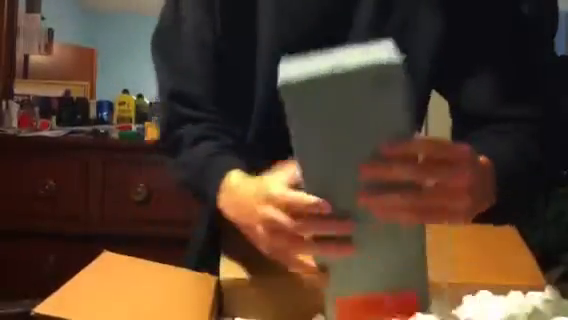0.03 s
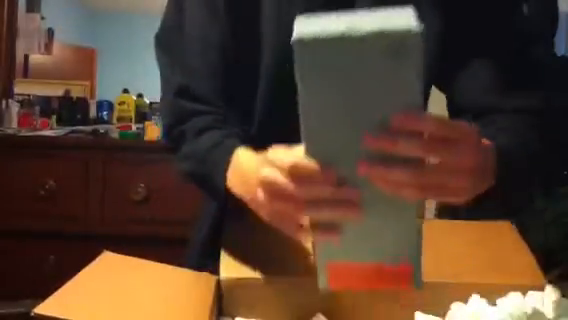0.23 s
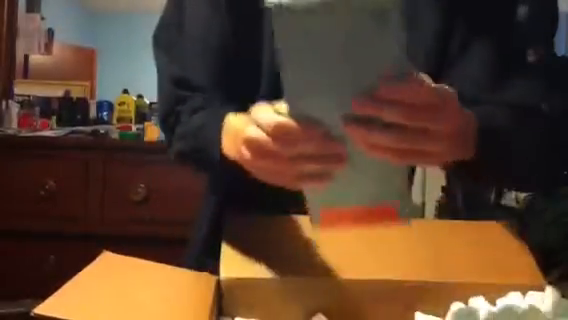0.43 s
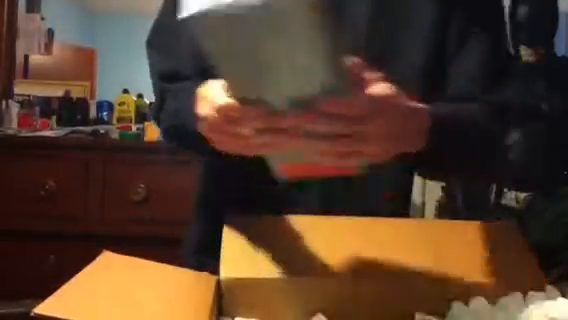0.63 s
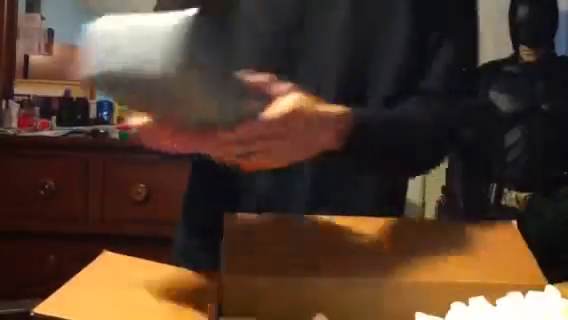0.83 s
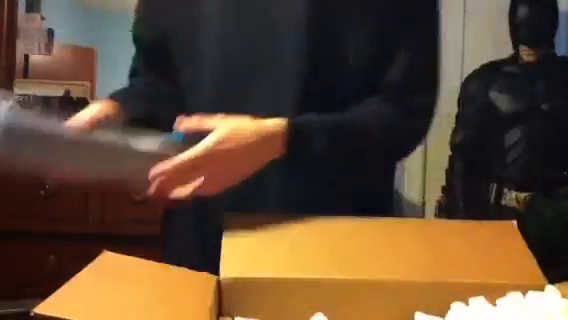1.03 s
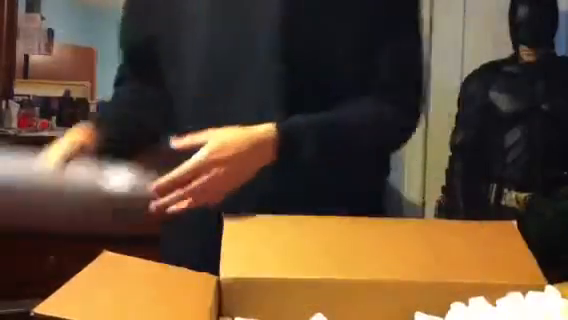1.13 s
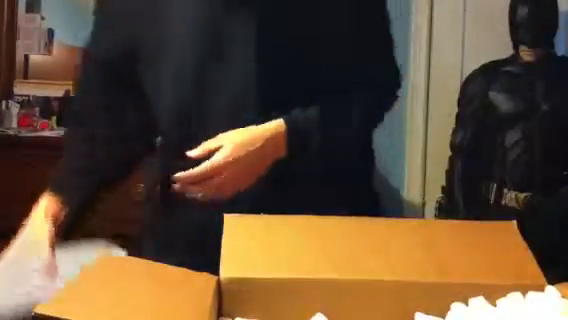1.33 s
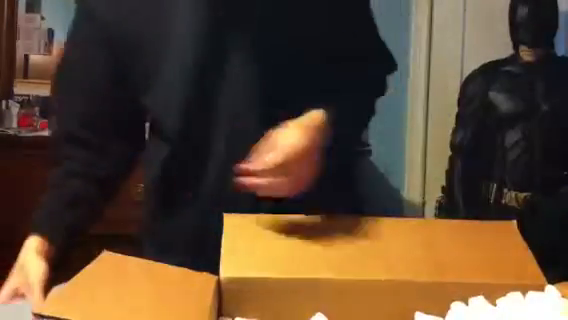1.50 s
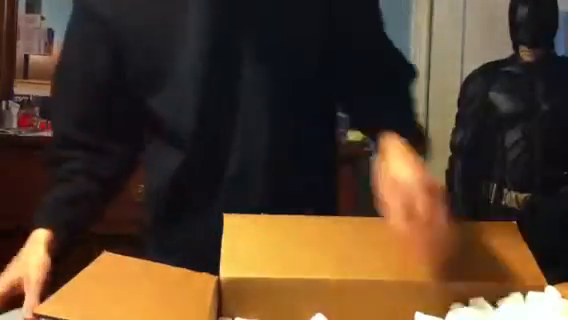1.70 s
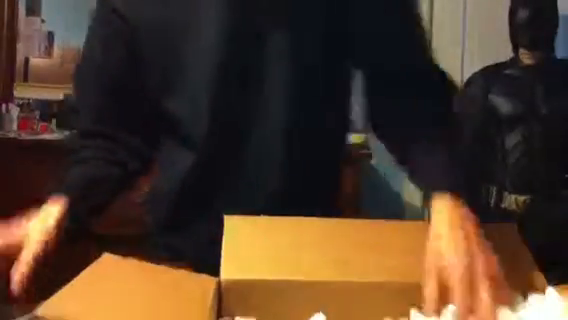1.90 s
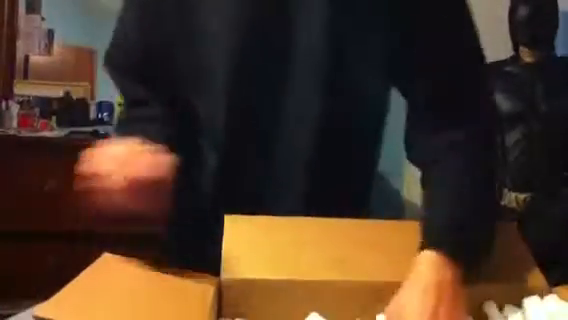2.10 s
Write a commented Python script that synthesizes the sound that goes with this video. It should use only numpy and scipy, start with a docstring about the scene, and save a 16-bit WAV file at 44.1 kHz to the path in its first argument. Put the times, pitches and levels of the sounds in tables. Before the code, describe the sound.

A handled box knocks as its contents shift, is set down, then packing foam rustles.

```python
"""Unpacking a box from packing peanuts

One microphone in a small furnished room. A slim box is lifted out of a carton of packing peanuts:
foam hisses along it, and the contents knock inside it. Fingers pat the box and sleeves rub while it
is turned; it is set down with a lighter knock. A hand bumps the carton and digs into the foam again."""
import sys
import numpy as np
from scipy import signal
from scipy.fft import rfft, irfft, next_fast_len
from scipy.io import wavfile
from scipy.ndimage import map_coordinates

SR = 44100
rng = np.random.default_rng(int(sys.argv[2]) if len(sys.argv) > 2 else 0)


def generate_wav(signal):
    """Clip the signal to [-1, 1] and save it as 16-bit WAV at the path in sys.argv[1]."""
    frames = np.transpose(np.atleast_2d(signal))
    scaled = np.clip(frames, -1, 1) * 32767
    pcm = np.round(scaled).astype(np.int16)
    wavfile.write(sys.argv[1], SR, pcm)


N = 94815


def amp(db):
    """Decibels to gain."""
    return 10 ** (np.asarray(db) / 20)


def unit(x):
    """Scale to rms 1."""
    return x / np.sqrt(np.mean(x ** 2) + 1e-20)


def along(points, hz):
    """Interpolate rows of frequency_hz, value on a log frequency axis."""
    frequencies, values = np.transpose(points)
    return np.interp(np.log(hz + 1), np.log(frequencies + 1), values)


def level(rows):
    """Gain per sample from rows of time_s, level_db."""
    return amp(np.interp(np.arange(N) / SR, *np.transpose(rows)))


def wobble(rate_hz):
    """A smooth random curve with rate_hz knots a second."""
    knots = rng.standard_normal(int(N * rate_hz / SR) + 4)
    return map_coordinates(knots, [np.arange(N) * rate_hz / SR])


def colour(x, spectrum):
    """Causal filter from rows of frequency_hz, gain_db, scaled to keep the power of white noise."""
    size = 2 * next_fast_len(N)
    gain = unit(amp(along(spectrum, np.fft.rfftfreq(size, 1 / SR))))
    cepstrum = irfft(np.log(gain), size)
    cepstrum[1:size // 2] *= 2  # fold to minimum phase
    cepstrum[size // 2 + 1:] = 0
    return irfft(rfft(x, size) * np.exp(rfft(cepstrum)), size)[:N]


def add(track, start_s, sound):
    """Mix a sound into the track at start_s."""
    i = max(0, round(start_s * SR))
    track[i:i + len(sound)] += sound[:max(0, N - i)]


def blows(rows, spectrum, t60_s, room_db, push_db):
    """Each contact gives one push, shakes damped cardboard panels, and the room answers."""
    out, t = np.zeros(N), np.arange(SR // 2) / SR
    for start_s, db, *_ in rows:
        shake = rng.standard_normal(len(t)) * amp(-60 * t / t60_s)
        shake[0] += amp(push_db)
        add(out, start_s, amp(db) * (shake + amp(room_db) * room_tail()))
    return colour(out, spectrum)


def ring(start_s, modes, attack_s):
    """A contact sets the modes ringing as decaying sines."""
    out, t = np.zeros(N), np.arange(SR // 2) / SR
    attack = 1 - np.exp(-t / attack_s)
    for hz, db, t60_s in modes:
        phase = 2 * np.pi * (hz * t + rng.random())
        add(out, start_s, amp(db - 60 * t / t60_s) * np.sin(phase) * attack)
    return out


def cracks(rows, spectrum, t60_s, room_db):
    """The brief snap of hard edges meeting, and its reverberation."""
    out, t = np.zeros(N), np.arange(SR // 2) / SR
    for start_s, _, db in rows:
        snap = amp(-60 * t / t60_s) * rng.standard_normal(len(t))
        add(out, start_s, amp(db) * (snap + amp(room_db) * room_tail()))
    return colour(out, spectrum)


def contents_knock():
    """The contents shift and strike the inside of the held box; the second contact rings its modes."""
    # contents against the box: start_s, level_db, crack_db
    contacts = [(.2283, -35, -25), (.2299, -23, -31), (.2333, -24, -31), (.2395, -37.5, -37),
                (.2485, -37.5, -32)]
    # modes of the held box: pitch_hz, level_db, t60_s
    box_modes = [(345, -37, .13), (388, -36, .17), (474, -28, .18), (540, -26.5, .17), (638, -28.5, .18),
                 (765, -31, .15), (818, -32, .13), (897, -29.5, .18), (976, -32, .18), (1083, -31.5, .19),
                 (1386, -33, .14), (1528, -30.5, .18), (1576, -29, .19), (1661, -28, .215),
                 (1770, -31, .18), (1927, -35.5, .19), (2122, -34, .18), (2532, -37.5, .15),
                 (2946, -43, .17)]
    # dense ringing of its panels, and the snap of its edges: frequency_hz, gain_db
    panel_spectrum = [(30, -52), (90, -39), (180, -28), (270, -17.5), (350, -9.5), (530, 0), (800, -5.5),
                      (1080, -6), (1330, -9.5), (1680, -1.5), (2200, -6), (2650, -21), (3000, -15),
                      (4000, -31), (6000, -31.5), (10000, -36), (16000, -35.5)]
    snap_spectrum = [(100, -23), (600, 8), (3000, -6), (4000, -12.5), (8000, -14.5), (16000, -23)]
    snap = cracks(contacts, snap_spectrum, t60_s=0.0067, room_db=-8)
    panels = blows(contacts, panel_spectrum, t60_s=0.09, room_db=-11.5, push_db=25)
    return panels + ring(contacts[1][0], box_modes, attack_s=0.00053) + snap


def box_set_down():
    """One edge lands with a sharp tick, then the rest of the box, which rattles briefly."""
    # box meeting its support: start_s, level_db, crack_db
    contacts = [(1.5731, -39.5, -28), (1.5785, -37.5, -35), (1.5828, -42.5, -37), (1.6207, -78, -37)]
    # a thin bright edge rattling as it settles: start_s, level_db
    rattles = [(1.584, -51.5), (1.599, -59.5)]
    # modes of the box on its support: pitch_hz, level_db, t60_s
    resting_modes = [(224.3, -41, 0.13), (370, -27, 0.11), (526.6, -32.5, 0.12), (708, -48, .18),
                     (832, -42, .16), (934, -31.5, 0.041), (1161, -43, .13), (1385, -47, 0.17),
                     (1980, -53, .12), (6030, -65, .3)]
    # supported panels, rattling edge and landing snap: frequency_hz, gain_db
    panel_spectrum = [(30, -56), (100, -29.5), (220, -4.5), (450, -4), (950, -1), (1500, -7), (2200, -14.5),
                      (3200, -36), (4900, -41), (7000, -36), (9500, -20), (16000, -28.5)]
    edge_spectrum = [(100, -50), (3500, -24), (5000, -20), (5400, -3.5), (5850, -2), (6500, -19),
                     (8000, -16), (16000, -37)]
    snap_spectrum = [(100, 0), (900, 6.5), (3500, -4), (6000, -6.5), (10000, 2.5), (16000, -7)]
    snap = cracks(contacts, snap_spectrum, t60_s=0.005, room_db=-19)
    panels = blows(contacts, panel_spectrum, t60_s=0.095, room_db=-5.5, push_db=20)
    rattle = blows(rattles, edge_spectrum, t60_s=0.14, room_db=-2.5, push_db=8)
    return panels + ring(contacts[0][0], resting_modes, attack_s=0.0048) + snap + rattle


def packing_peanuts(slips_per_s=3200, spread_db=1.5, hiss_db=6, walls_db=-3.5):
    """Countless tiny slips of foam merge into a hiss; the carton's walls pick them up."""
    # foam rubbed by the box, then by the hand: time_s, level_db
    stirring = [(0, -60), (.05, -56.5), (.11, -57), (.2, -61.5), (.35, -68), (.65, -68), (.8, -75),
                (1.4, -75.5), (1.65, -72), (1.87, -67.5), (1.943, -64), (1.96, -51.5), (1.99, -48),
                (2.07, -48.5), (2.15, -50.5)]
    # rubbed foam and carton walls: frequency_hz, gain_db
    foam_spectrum = [(40, -36), (200, -4), (600, -8), (1200, -5.5), (2500, 0), (4000, -1), (7000, -3),
                     (10000, -1), (13000, -4), (16000, -8.5)]
    wall_spectrum = [(40, -32), (90, -17), (160, 4), (360, 0), (460, -3), (600, 2.5), (1000, -7.5),
                     (1800, -9), (5000, -37.5)]
    slipping = rng.random(N) < slips_per_s / SR
    slips = slipping * rng.standard_normal(N) * amp(spread_db * rng.standard_normal(N))
    grains = unit(unit(slips) + amp(hiss_db) * rng.standard_normal(N))
    walls = amp(walls_db + 1.9 * wobble(50)) * colour(rng.standard_normal(N), wall_spectrum)
    foam = amp(0.72 * wobble(60)) * colour(grains, foam_spectrum)
    return level(stirring) * (foam + walls)


def sleeves():
    """Cloth rubs unevenly as the hands move."""
    # strength of the rubbing: time_s, level_db
    rubbing = [(0, -64), (.06, -61), (.13, -66), (.36, -65), (.55, -64), (.6, -69), (.75, -72), (.86, -67),
               (1.02, -76), (1.12, -73), (1.33, -73), (1.488, -69), (1.505, -60), (1.56, -62), (1.69, -64),
               (1.8, -71), (2.15, -66)]
    # cloth friction: frequency_hz, gain_db
    cloth_spectrum = [(40, -32), (90, -29), (160, -2.5), (230, -2.5), (470, -1), (610, 2), (1000, -5.5),
                      (1800, -11), (3000, -28), (8000, -33), (16000, -38)]
    return level(rubbing) * amp(2.4 * wobble(44.96)) * colour(rng.standard_normal(N), cloth_spectrum)


def palms():
    """A palm slides on the box in short swells of friction noise."""
    # palm strokes: centre_s, half_length_s, level_db, peak_hz
    slides = [(0.178, .025, -58.5, 2150), (0.216, 0.021, -50, 1120), (0.667, 0.032, -69.5, 1290),
              (0.853, 0.051, -66, 402), (1.111, 0.067, -62.5, 1407), (1.126, 0.026, -67.5, 3800),
              (1.693, .06, -64, 1630), (2.132, 0.025, -47.5, 790)]
    # skin on cardboard: multiple_of_peak, gain_db
    palm_spectrum = [(.1, -39), (.25, -18), (.5, 3), (1, 8), (1.6, -1.5), (2.3, -12), (4.5, -10.5),
                     (12, -26)]
    out, t = np.zeros(N), np.arange(N) / SR
    for centre_s, half_length_s, db, peak_hz in slides:
        spectrum = [(peak_hz * ratio, gain_db) for ratio, gain_db in palm_spectrum]
        friction = colour(rng.standard_normal(N), spectrum)
        swell = np.exp(-2 * ((t - centre_s) / half_length_s) ** 2)
        out += amp(db + 0.59 * wobble(81)) * swell * friction
    return out


def fingers():
    """Fingers pat the box and shake its panels softly."""
    # fingers landing: start_s, level_db
    pats = [(.016, -54), (.157, -62), (.404, -58.5), (.479, -60.5), (.511, -70), (.659, -64), (.767, -65),
            (.806, -60), (.942, -64.5), (1.081, -72.5), (1.206, -66.5), (1.265, -59), (1.365, -67.5),
            (1.499, -58.5), (1.718, -55), (1.85, -61)]
    # patted cardboard: frequency_hz, gain_db
    pat_spectrum = [(40, -20), (100, -9), (190, 0.5), (450, -1), (620, 6.5), (1050, 4), (1500, -9.5),
                    (2200, -7), (3500, -34.5), (16000, -34)]
    return blows(pats, pat_spectrum, t60_s=0.17, room_db=-9, push_db=10.5)


def carton_bumps():
    """A hand bumps the carton: the walls thud and the flap rings."""
    # hand against the carton: start_s, level_db
    bumps = [(1.886, -57), (1.906, -48), (1.913, -49.5), (2.065, -52), (2.104, -46), (2.134, -43)]
    # modes of the flap: pitch_hz, relative_db, t60_s
    flap_modes = [(268, 3, .09), (960, 0, .08)]
    # struck carton walls: frequency_hz, gain_db
    thud_spectrum = [(40, -40), (100, -34), (170, 1.5), (260, 3.5), (360, 6), (480, -6.5), (1000, -3.5),
                     (1500, -13), (3000, -33.5), (16000, -31)]
    flap = sum(amp(db) * ring(start_s, flap_modes, attack_s=0.0022) for start_s, db in bumps)
    return flap + blows(bumps, thud_spectrum, t60_s=0.07, room_db=-4, push_db=14)


def carton_hollow(pitch_hz=364, t60_s=0.24, attack_s=0.012, waver_rad=0.55):
    """The jostled carton sounds one hollow note that swells quickly and dies, wavering."""
    # jolts to the carton: start_s, level_db
    jolts = [(.03, -47.5), (.06, -55), (.15, -59), (1.497, -50), (1.672, -53), (1.722, -56), (1.885, -48),
             (1.925, -50)]
    out, t = np.zeros(N), np.arange(SR) / SR
    attack = 1 - np.exp(-t / attack_s)
    for start_s, db in jolts:
        phase = 2 * np.pi * pitch_hz * (t + start_s) + waver_rad * wobble(63)[:SR]
        add(out, start_s, amp(db - 60 * t / t60_s) * attack * np.sin(phase))
    return out * amp(2 * wobble(70))


def cardboard_drags(width_hz=65, fade_s=0.021):
    """Friction stirs a narrow cardboard resonance, whose pitch shifts as the contact travels."""
    # cardboard dragged along: start_s, end_s, level_db, start_hz, end_hz
    drags = [(0.038, .2, -62.5, 352, 393), (1.497, 1.52, -63, 1040, 910), (1.98, 2.17, -57, 490, 653),
             (.81, 0.92, -65, 385, 350)]
    out, t = np.zeros(N), np.arange(N) / SR
    for start_s, end_s, db, start_hz, end_hz in drags:
        pitch_hz = np.interp(t, [start_s, end_s], [start_hz, end_hz])
        phase = 2 * np.pi * np.cumsum(pitch_hz) / SR
        band = wobble(width_hz) * np.cos(phase) + wobble(width_hz) * np.sin(phase)
        fade = np.clip(np.minimum(t - start_s, end_s - t) / fade_s, 0, 1)
        out += amp(db) * fade * unit(band)
    return out


def room_tail():
    """Half a second of the small room's reverberation, each band dying at its own speed."""
    # decay of the furnished room: frequency_hz, t60_s
    decay_times = [(100, 0.089), (400, 0.25), (1600, 0.27), (4000, 0.26), (14000, .2)]
    hz, t, bands = signal.stft(rng.standard_normal(SR // 2), SR, nperseg=256)
    decay = amp(-60 * t / along(decay_times, hz)[:, None])
    _, tail = signal.istft(bands * decay, SR, nperseg=256)
    return tail[:SR // 2]


def room_tone(air_db=-67.5, whine_hz=15000, whine_db=-82.5):
    """Steady room tone, hiss and a faint electrical whine."""
    # noise floor at the microphone: frequency_hz, gain_db
    air_spectrum = [(25, -1), (55, -41), (90, -13), (150, 4.5), (228, 6), (450, -9.5), (600, -28),
                    (1150, -7.5), (4000, -13), (10500, -14.5), (14600, -12), (15800, -12)]
    whine = amp(whine_db + 2 * wobble(20)) * np.sin(2 * np.pi * whine_hz * np.arange(N) / SR)
    return amp(air_db) * colour(rng.standard_normal(N), air_spectrum) + whine


def scene():
    """The handling and the room at one microphone, alike in both channels."""
    mono = contents_knock() + box_set_down() + packing_peanuts()
    mono += sleeves() + palms() + fingers()
    mono += carton_bumps() + carton_hollow() + cardboard_drags()
    mono += room_tone()
    return np.array([mono, mono])


def record(dry):
    """The microphone chain passes nothing above top_hz."""
    top_hz = 15780
    size = next_fast_len(N + SR // 2)
    passband = np.fft.rfftfreq(size, 1 / SR) < top_hz
    return irfft(rfft(dry, size) * passband, size)[:, :N]


dry = scene()
out = record(dry)
generate_wav(out)
```